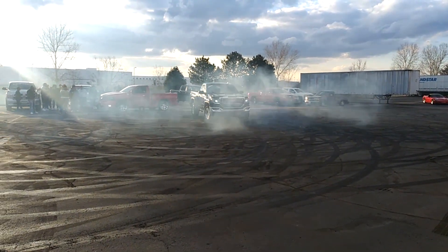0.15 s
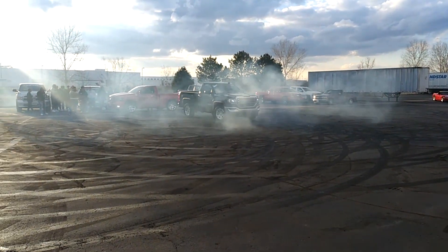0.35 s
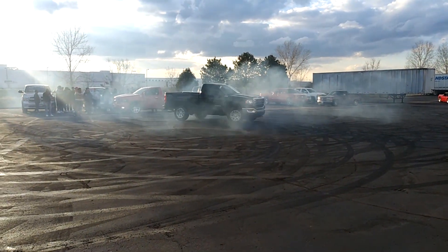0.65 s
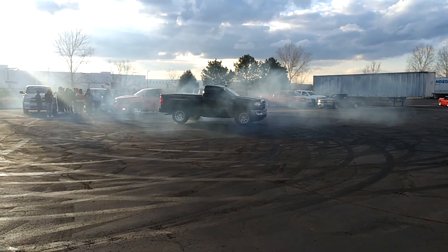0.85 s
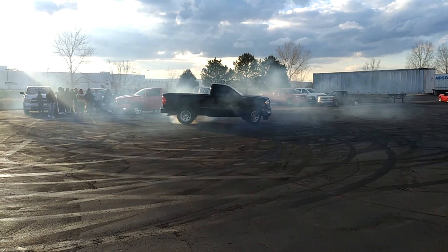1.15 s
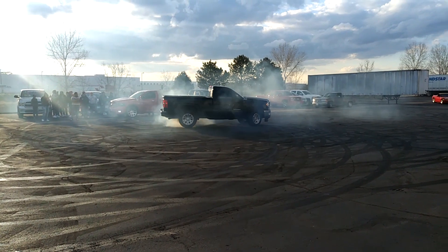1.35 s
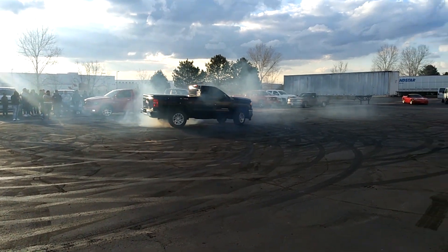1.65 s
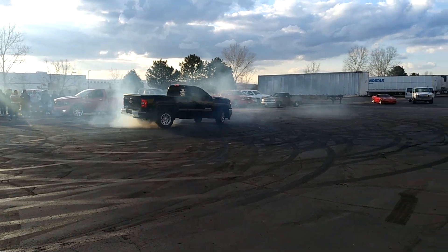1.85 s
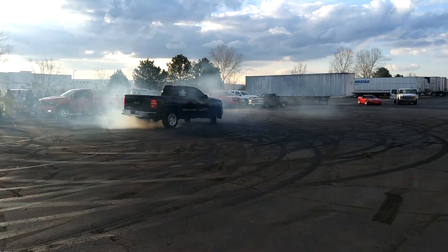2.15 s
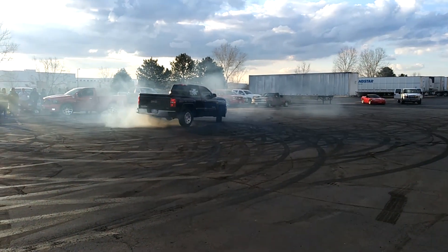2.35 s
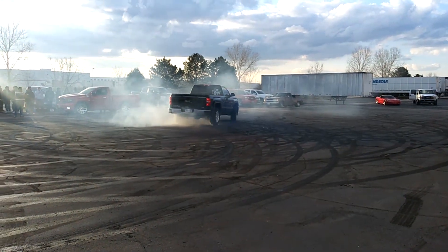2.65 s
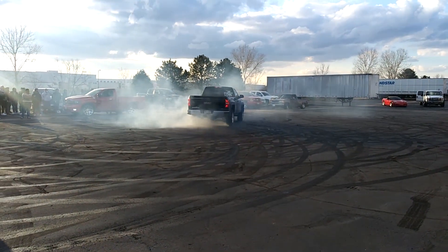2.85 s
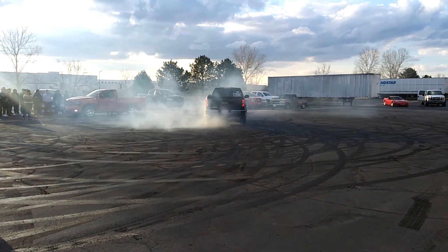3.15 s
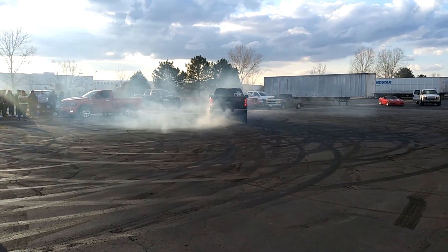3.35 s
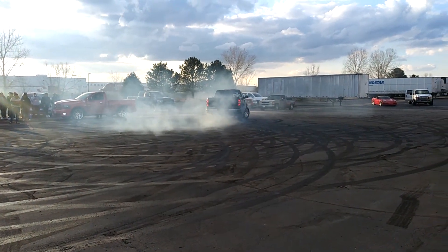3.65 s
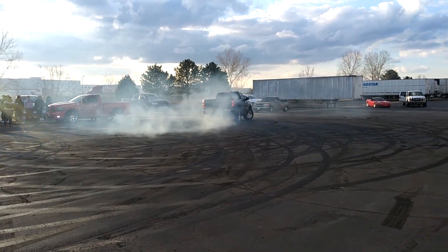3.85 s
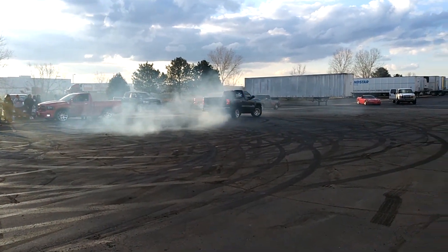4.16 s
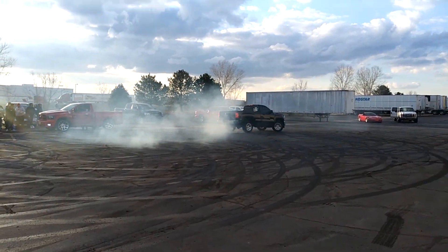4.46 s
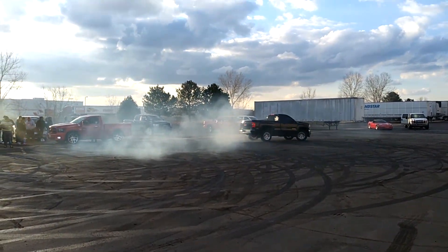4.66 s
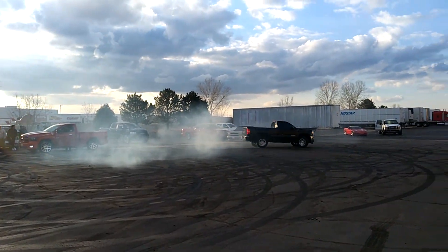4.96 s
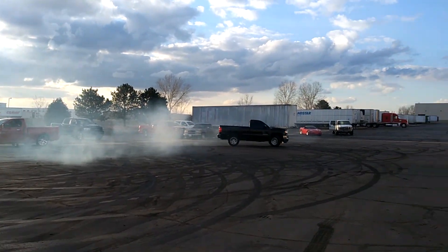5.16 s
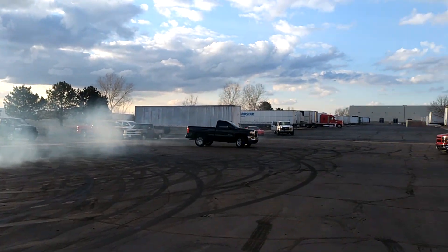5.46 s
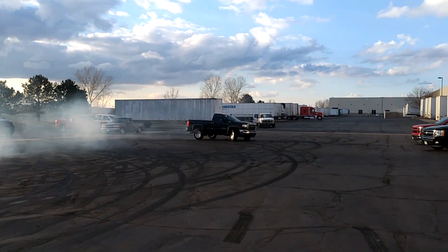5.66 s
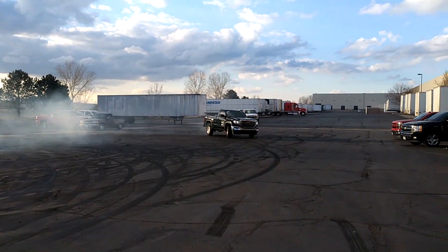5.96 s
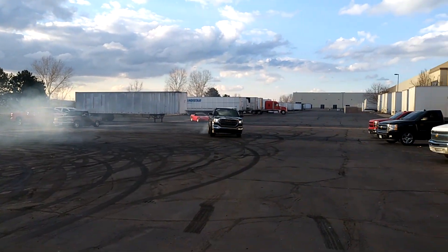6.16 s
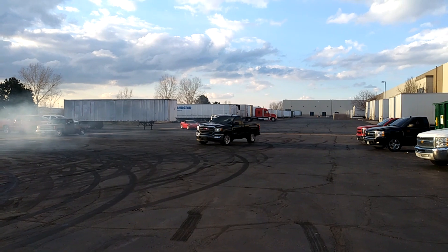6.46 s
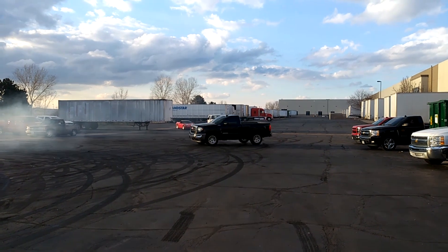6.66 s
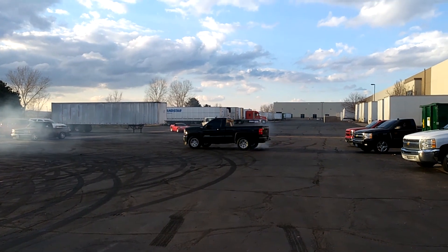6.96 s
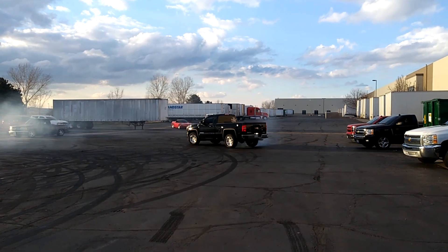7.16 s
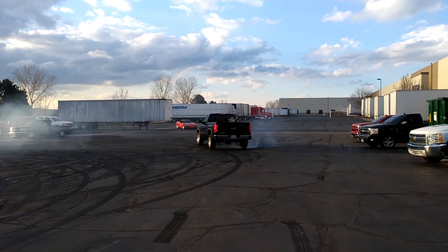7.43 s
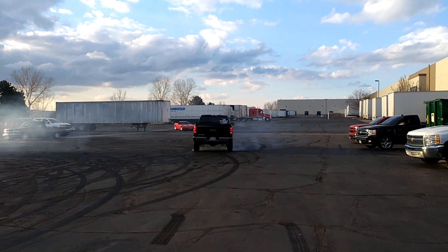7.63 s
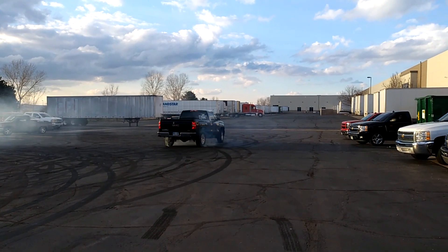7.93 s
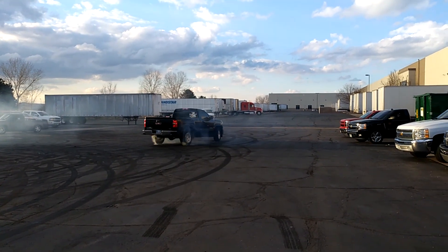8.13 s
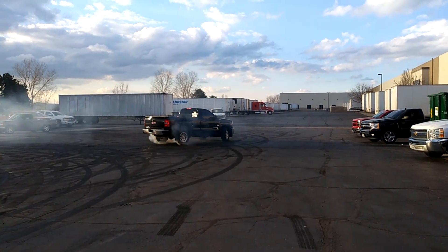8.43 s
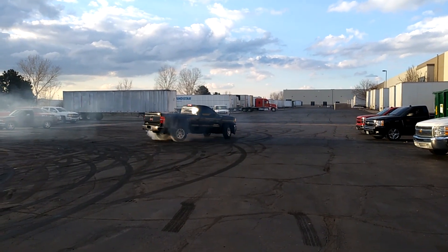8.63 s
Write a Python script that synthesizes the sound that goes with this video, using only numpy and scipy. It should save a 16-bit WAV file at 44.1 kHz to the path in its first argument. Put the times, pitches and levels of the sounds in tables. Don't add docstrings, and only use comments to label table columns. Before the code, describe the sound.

A pickup's rear tyres hiss and squeal through spins on open asphalt, break into short hopping chirps, then screech loudly again over a throaty engine roar.

```python
import sys
import numpy as np
from scipy import signal
from scipy.fft import rfft, irfft, next_fast_len
from scipy.io import wavfile

SR = 44100
rng = np.random.default_rng(int(sys.argv[2]) if len(sys.argv) > 2 else 0)


def volts_from_decibels(level):
    exponent = np.asarray(level, float) / 20
    return 10 ** exponent


def file_out(sig):
    cols = np.atleast_2d(sig).T
    lim = np.clip(cols, -1, 1)
    pcm = np.round(lim * 32767).astype(np.int16)
    wavfile.write(sys.argv[1], SR, pcm)


N = 387638

# freq_hz, level_db_per_hz
SCRUB_SPECTRUM = [(820, -41.5), (960, -9), (1070, -11), (1250, -4.5), (1470, -2.5), (1740, -6), (2050, 2),
                  (2250, 3.5), (2450, 0), (2700, -4.5), (3100, -15.5), (3600, -28.5)]
HISS_SPECTRUM = [(2500, -4.5), (2900, 0), (3400, 5), (3830, 4), (4270, -6), (4550, -14.5), (5000, -13),
                 (5600, -19.5), (6500, -32), (7150, -42), (7600, -35), (8600, -42.5), (10500, -56.5),
                 (14000, -60)]
# time_s, scrub_db, hot_rubber_brightness_db
SLIDE = [(0, -12.5, -5.5), (.16, -18, -6), (.76, -17.5, -1), (1.1, -14, -6), (1.6, -19.5, -2.5),
         (2.3, -18, -1.5), (2.7, -24, -6), (3.1, -23, -6.5), (3.34, -25.5, -5.5), (3.45, -35, -1.5),
         (3.66, -29, -8.5), (4.1, -27, -8.5), (4.6, -21, -8), (5.3, -16, -10.5), (5.55, -8, -9.5),
         (6.57, -14, 0.5), (7.6, -12, -5.5), (8.79, -18, -3.5)]
# centre_s, hiss_swell_db, half_length_s
FLARES = [(0.29, 5, 0.096), (1.645, 3.5, 0.23), (4.6, 3.5, 0.082), (4.9, 3, .06), (5.62, 1, 0.12),
          (6.31, 8, 0.05), (6.16, -2, 0.065), (6.85, -2, 0.087), (6.58, 3, 0.13), (5.86, 1, 0.1),
          (8.6, 0.5, .1), (7.1, 4.5, 0.19), (7.42, 0, 0.1), (6.9, 0.5, 0.088)]


def sliding_rubber():
    slide_db, bright_db = in_time(SLIDE)
    flare_db = swells(FLARES)
    scrub_db = slide_db + 0.43 * flare_db - 1.0
    hiss_db = slide_db + bright_db + flare_db + 0.38 * drift(5.6)
    scrub = colour(patchy(805.5, 3298, count=12, patchy_db=2.0, rate_hz=11.0), SCRUB_SPECTRUM)
    hiss = colour(patchy(2344, 14130, count=10, patchy_db=1.5, rate_hz=17.0), HISS_SPECTRUM)
    return volts_from_decibels(scrub_db) * scrub + volts_from_decibels(hiss_db) * hiss


def squeal(rows, count, flutter_db, third_db, wander_hz):
    start = round(rows[0][0] * SR)
    length = min(round(rows[-1][0] * SR), N) - start
    pitch_hz, first_db, octave_db, scatter = in_time(rows, start=start, count=length)
    sound = np.zeros(length)
    for _ in range(count):
        patch_hz = pitch_hz * (1 + scatter * drift(wander_hz, count=length))
        phase = 2 * np.pi * np.cumsum(patch_hz) / SR
        sound += volts_from_decibels(first_db + flutter_db * drift(20.0, count=length)) * np.sin(phase)
        upper = np.sin(2 * phase + 1.6) + volts_from_decibels(third_db) * np.sin(3 * phase)
        sound += volts_from_decibels(octave_db + flutter_db * drift(36.0, count=length)) * upper
    fade = signal.windows.tukey(length, min(1, 0.017 * SR / length))
    out = np.zeros(N)
    out[start:start + length] = sound * np.sqrt(2 / count) * fade
    return out


# time_s, pitch_hz, first_partial_db, octave_db, pitch_scatter_share
ROUGH_SQUEALS = [
    [(0, 1156, -28.5, -21.5, .08), (1, 1174, -33.5, -27, .08)],
    [(5.33, 1229, -28, -18, 0.071), (5.55, 1200, -21.5, -17.5, 0.069), (5.85, 1167, -26.5, -13, 0.059),
     (6.2, 1152, -16, -13.5, 0.074), (6.65, 1154, -19.5, -18, .07), (6.78, 1220, -19, -20.5, .05),
     (6.9, 1242, -27.5, -20.5, 0.072), (7.05, 1260, -17, -22.5, .05), (7.15, 1290, -19, -20, .05)],
    [(7.13, 1350, -25.5, -22, .1), (7.4, 1433, -23, -26.5, 0.082), (7.6, 1392, -21.5, -30, .07),
     (7.87, 1390, -31.5, -26.5, 0.091)],
]


def rough_squeals():
    return sum(squeal(rows, count=5, flutter_db=5.0, third_db=-12.5, wander_hz=88.27)
               for rows in ROUGH_SQUEALS)


def burst(start_s, length_s, pitch_hz, first_db, octave_db, scatter, droop_db):
    light_grip = (pitch_hz * 1.08, first_db - 2.5, octave_db - 20, scatter)
    bite_s = start_s + min(0.014, length_s / 2)
    release_s = start_s + 0.6 * length_s
    return [(start_s, *light_grip),
            (bite_s, pitch_hz, first_db, octave_db, scatter),
            (release_s, pitch_hz, first_db + droop_db / 3, octave_db + droop_db, scatter),
            (start_s + length_s, *light_grip)]


# start_s, length_s, pitch_hz, first_partial_db, octave_db
THIN_SQUEALS = [(3.569, 0.055, 1375, -26.5, -31), (3.645, 0.061, 1290, -32, -28.5),
                (3.68, .065, 1450, -24, -33), (3.794, 0.086, 1410, -29.5, -25.5),
                (3.862, .035, 1400, -25.5, -19), (3.882, .04, 1395, -20.5, -14.5),
                (3.94, .06, 1448, -28, -23), (4.0, 0.046, 1404, -32, -29),
                (4.041, 0.072, 1420, -33.5, -27.5), (4.092, .13, 1450, -31.5, -34),
                (4.25, 0.056, 1430, -25.5, -25), (4.288, 0.11, 1485, -21, -19),
                (4.38, 0.11, 1435, -21.5, -18), (4.444, 0.13, 1525, -21, -22.5),
                (4.565, 0.084, 1468, -25, -18), (4.63, 0.033, 1380, -25, -11.5),
                (4.67, 0.078, 1448, -19, -19.5), (4.73, 0.077, 1433, -41, -16.5),
                (4.801, 0.057, 1522, -27, -23), (4.835, 0.048, 1300, -27, -14),
                (4.89, .055, 1500, -22, -27.5), (4.955, 0.028, 1458, -16, -19),
                (5.07, 0.037, 1522, -25, -20.5), (5.315, 0.078, 1375, -19.5, -33)]
# start_s, length_s, pitch_hz, first_partial_db, octave_db
HIGH_ROW = [(4.857, .04, 2320, -21, -44), (4.882, 0.03, 1950, -21.5, -49.5), (4.92, 0.018, 1990, -18, -39),
            (4.965, 0.057, 1980, -21, -42), (5.134, 0.063, 1800, -20, -24.5),
            (5.214, 0.058, 1727, -25.5, -26), (5.243, .04, 1820, -19.5, -31.5),
            (5.286, .055, 1940, -17, -33.5), (5.345, 0.054, 1903, -19.5, -27.5),
            (5.396, 0.046, 1810, -18, -17.5), (5.426, .06, 1760, -19, -30), (5.536, .075, 1780, -16, -21),
            (5.624, .055, 1820, -14.5, -21), (5.38, 0.099, 2474, -20.5, -44), (5.54, .22, 2490, -22, -39)]


def thin_squeals():
    bursts = [burst(*row, scatter=0.024, droop_db=-0.5) for row in THIN_SQUEALS + HIGH_ROW]
    return sum(squeal(rows, count=2, flutter_db=2.5, third_db=-26.5, wander_hz=91.0) for rows in bursts)


def glide(start_s, length_s, pitch_hz, glide_hz_per_s, level_db):
    rows = []
    for after_s in (0, length_s):
        hz = pitch_hz + glide_hz_per_s * after_s
        octave_db = level_db + 3.5 - 0.1739 * (hz - 1200)
        rows.append((start_s + after_s, hz, level_db, octave_db, 0.035))
    return rows


# start_s, length_s, pitch_hz, glide_hz_per_s, level_db
STRANDS = [(0, .18, 2308, 2.5, -24), (0.211, 0.15, 2282, 0.5, -17.5), (0.238, 0.074, 3205, 2, -23),
           (0.401, 0.12, 2264, -0.5, -19), (3.638, 0.074, 1200, 3498, -26.5), (3.722, .52, 1435, -0.5, -34),
           (4.25, .58, 1455, 49.5, -27.5), (4.8, .3, 1500, -51, -25), (5.002, 0.13, 1400, 1201, -24),
           (5.125, 0.14, 1509, -900, -21), (5.199, 0.18, 1418, -200, -25.5),
           (4.899, .38, 2893, 102.5, -22.5), (5.274, 0.14, 2666, -500, -22.5),
           (5.357, .45, 2400, -300, -18), (5.522, .2, 3537, 498.5, -20)]


def strands():
    return sum(squeal(glide(*row), count=2, flutter_db=4.0, third_db=-22.0, wander_hz=39.96)
               for row in STRANDS)


# start_s, length_s, pitch_hz, first_partial_db, octave_db
CHIRPS = [
    (2.702, 0.036, 1400, -22.5, -36),
    (2.964, 0.034, 1354, -23.5, -33),
    (2.799, .062, 1261, -18.5, -12.5),
    (2.907, 0.06, 1228, -21.5, -11.5),
    (3.028, 0.049, 1227, -17.5, -11.5),
    (3.087, 0.03, 1238, -21.5, -14.5),
    (3.197, .05, 1288, -26, -30),
    (3.255, 0.03, 1215, -19.5, -5),
    (3.297, 0.048, 1226, -17, -13),
    (3.359, .035, 1125, -29, -10),
]
# start_s, length_s, pitch_hz, first_partial_db, octave_db
OTHER_WHEEL = [
    (.085, .1, 1152, -19, -34.5),
    (.2, 0.036, 1110, -22, -28),
    (0.263, 0.092, 1170, -21.5, -46.5),
    (0.613, 0.056, 1268, -21.5, -47.5),
    (.792, .07, 1190, -18, -40.5),
    (3.351, .07, 925, -32, -56),
    (4.125, 0.096, 1153, -28.5, -39),
    (4.21, 0.11, 1098, -30, -48),
]


def chirps():
    bursts = [burst(*row, scatter=0.023, droop_db=-3) for row in CHIRPS]
    bursts += [burst(*row, scatter=0.012, droop_db=-3) for row in OTHER_WHEEL]
    return sum(squeal(rows, count=1, flutter_db=2.0, third_db=-19.5, wander_hz=130.0) for rows in bursts)


# time_s, double_cycle_hz, level_db
DOUBLED = [
    (3.54, 630, -50),
    (3.57, 662, -27),
    (3.63, 637, -31),
    (3.68, 655, -35),
    (3.744, 700, -29),
    (3.79, 712, -38),
    (3.92, 700, -46),
]
# multiple, level_db
DOUBLED_PARTIALS = [(1, -26), (3, -6.5), (5, -9.5), (6, -20)]


def doubled_slip():
    cycle_hz, level_db = in_time(DOUBLED)
    phase = 2 * np.pi * np.cumsum(cycle_hz) / SR
    sounding = np.interp(np.arange(N) / SR, [3.54, 3.56, 3.88, 3.92], [0, 1, 1, 0])
    return sounding * sum(volts_from_decibels(level_db + 3.0 + db) * np.sin(k * phase) for k, db in DOUBLED_PARTIALS)


def tyre_tones():
    high_pass = signal.butter(6, 1000, "high", fs=SR, output="sos")
    sliding = signal.sosfilt(high_pass, rough_squeals() + thin_squeals() + strands())
    return sliding + chirps() + doubled_slip()


CYLINDERS_DB = [12.5, -10, 7.5, -5, 5, -13, -13, 9.5]


def firing_pulses(firings):
    at = np.flatnonzero(np.diff(np.floor(firings)))
    pulses = np.zeros(N)
    pulses[at] = volts_from_decibels(np.resize(CYLINDERS_DB, len(at)) + 2.2 * rng.standard_normal(len(at)))
    return pulses


# time_s, level_db
EXHAUST_LEVEL = [(0, -31), (2.35, -27), (2.65, -36), (3.36, -38), (3.54, -50), (3.62, -56), (3.75, -59),
                 (3.775, -42.5), (4.4, -33), (4.9, -24.5), (5.3, -25.5), (5.85, -37), (6.15, -32),
                 (6.4, -30), (7.2, -27.5), (8.79, -27.5)]


def throttle(stab_db):
    level_db, = in_time(EXHAUST_LEVEL)
    coast_db = -15 * span(2.44, 4.45, ramp_s=0.072)
    rumble_db = -43.5 + 0.9 * (level_db + 28) + 0.97 * stab_db
    hum_db = -50 + 0.69 * (rumble_db + 40) + 2 * coast_db
    return level_db + stab_db, rumble_db + coast_db, hum_db


# centre_s, swell_db, half_length_s
STABS = [(0.516, 5.5, 0.25), (.95, 5.5, 0.064), (1.17, 11.5, 0.28), (1.76, 8.5, 0.16), (1.55, 2.5, 0.057),
         (2.0, 3, 0.042), (2.2, 3.5, 0.19), (3.1, 3.5, 0.14), (3.815, 7, 0.025), (4.03, 5, 0.061),
         (3.7, 5, 0.038), (4.26, 4, 0.034), (4.6, 0.5, .06), (4.92, 3, 0.042), (5.17, 0.5, .08),
         (5.65, 3.5, 0.12), (6.784, -0.5, .12), (7.698, 5, .25), (8.453, 6, .16)]
# freq_hz, level_db_per_hz
EXHAUST_SPECTRUM = [(280, -38.5), (480, -13), (571, -6.5), (658, 1.5), (816, 4), (912, -0.5), (1100, -10.5),
                    (1430, -46.5), (2420, -120)]
RUMBLE_SPECTRUM = [(110, -55.5), (180, -21.5), (226, -11), (269, -4), (434, -5), (500, -1), (650, -22),
                   (1100, -120)]


def engine():
    stab_db = swells(STABS)
    exhaust_db, rumble_db, hum_db = throttle(stab_db)
    firing_hz = 293 * (1 + 0.004 * stab_db + 0.03 * drift(9.0))
    firings = np.cumsum(firing_hz) / SR
    pulses = firing_pulses(firings)
    gas = rms_one(patchy(166.5, 1337, count=6, patchy_db=2.0, rate_hz=4.3))
    gas_share = 0.72

    def pipe(spectrum):
        return np.sqrt(1 - gas_share) * colour(pulses, spectrum) + np.sqrt(gas_share) * colour(gas, spectrum)

    roar, rumble = pipe(EXHAUST_SPECTRUM), pipe(RUMBLE_SPECTRUM)
    away = span(4.35, 5.45, ramp_s=0.2)
    dull = signal.sosfilt(signal.butter(2, 610, fs=SR, output="sos"), roar)
    roar = (1 - away) * roar + away * volts_from_decibels(3.5) * dull
    hum = volts_from_decibels(hum_db + 1.2 * drift(6.7)) * np.sin(2 * np.pi * firings)
    return volts_from_decibels(exhaust_db + 1.5) * roar + volts_from_decibels(rumble_db + 1.5) * rumble + hum


# delay_s, level_db
ECHOES = [
    (.023, -16.5),
    (0.06, -21.5),
    (0.117, -31),
    (0.189, -27),
]


def lot_echoes(tones):
    return sum(volts_from_decibels(level_db) * np.roll(tones, round(delay_s * SR)) for delay_s, level_db in ECHOES)


def patchy(low_hz, high_hz, count, patchy_db, rate_hz):
    edges_hz = np.geomspace(low_hz, high_hz, count + 1)
    white = rng.standard_normal((2, N))
    out = np.zeros(N)
    for k in range(count):
        band_pass = signal.butter(2, edges_hz[k:k + 2], "band", fs=SR, output="sos")
        out += signal.sosfilt(band_pass, white[k % 2]) * volts_from_decibels(patchy_db * drift(rate_hz))
    return out


def colour(x, spectrum):
    size = next_fast_len(N)
    hz, db = np.transpose(spectrum)
    table_octaves = np.log2(hz)
    octaves = np.log2(np.maximum(np.arange(size // 2 + 1) * SR / size, 10))
    below = np.maximum(table_octaves[0] - octaves, 0)
    above = np.maximum(octaves - table_octaves[-1], 0)
    gain = volts_from_decibels(np.interp(octaves, table_octaves, db) - 40 * (below + above))
    return rms_one(irfft(rfft(x, size) * gain, size)[:N])


def drift(rate_hz, count=N):
    r = np.exp(-16 * np.pi * rate_hz / SR)
    settle = 3000
    slow = signal.lfilter([1], [1, -2 * r, r * r], rng.standard_normal(count // 8 + settle + 2))
    return np.interp(np.arange(count) / 8, np.arange(len(slow) - settle), rms_one(slow)[settle:])


def swells(events):
    total_db = np.zeros(N)
    for centre_s, swell_db, half_s in events:
        hold_s = 0.35 * half_s
        total_db += in_time([(centre_s - half_s, 0), (centre_s - hold_s, swell_db),
                             (centre_s + hold_s, swell_db), (centre_s + half_s, 0)])[0]
    return total_db


def span(start_s, end_s, ramp_s):
    t = np.arange(N) / SR
    return np.clip(np.minimum(t - start_s, end_s - t) / ramp_s, 0, 1)


def in_time(rows, start=0, count=N):
    time_s, *columns = np.transpose(rows)
    return [np.interp((start + np.arange(count)) / SR, time_s, column) for column in columns]


def rms_one(x):
    return x / np.sqrt(np.mean(x ** 2) + 1e-20)


def scene():
    tones = tyre_tones()
    return (sliding_rubber() + tones + lot_echoes(tones) + engine())[None]


def band_limit(x):
    return signal.sosfilt(signal.butter(12, 15830, fs=SR, output="sos"), x)


def record(dry):
    limit, release_db_per_s = 0.53, 1000
    x = signal.sosfilt(signal.butter(6, 210, "high", fs=SR, output="sos"), dry[0])
    over_db = 20 * np.log10(np.maximum(1, np.abs(x) / limit))
    ramp_db = np.arange(N) * release_db_per_s / SR
    held_db = np.maximum.accumulate(over_db + ramp_db) - ramp_db
    crossings = np.flatnonzero(np.diff(np.signbit(x), prepend=~np.signbit(x[:1])))
    cut_db = np.repeat(np.maximum.reduceat(held_db, crossings), np.diff(crossings, append=N))
    limited = signal.sosfilt(signal.butter(2, 15000, fs=SR, output="sos"), x * volts_from_decibels(-cut_db))
    return band_limit(limited[None])


dry = scene()
out = record(dry)
file_out(out)
```